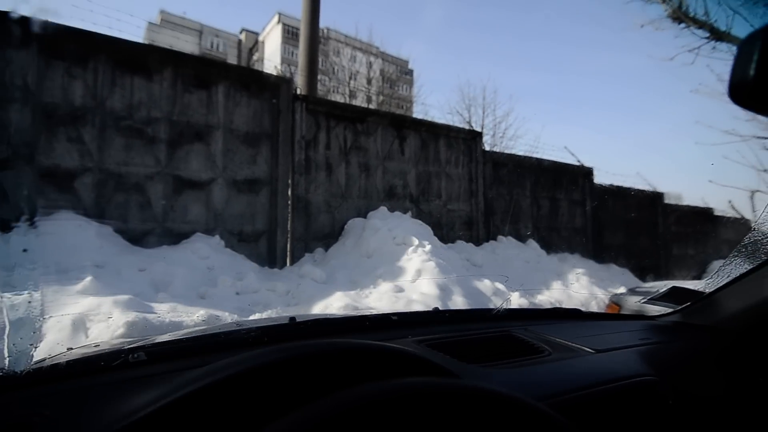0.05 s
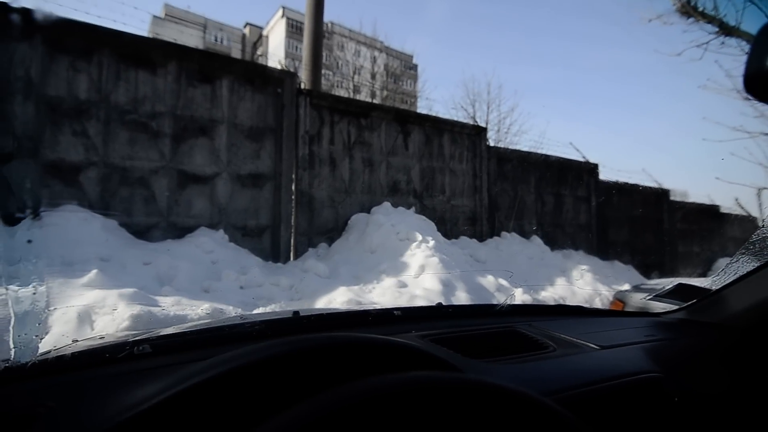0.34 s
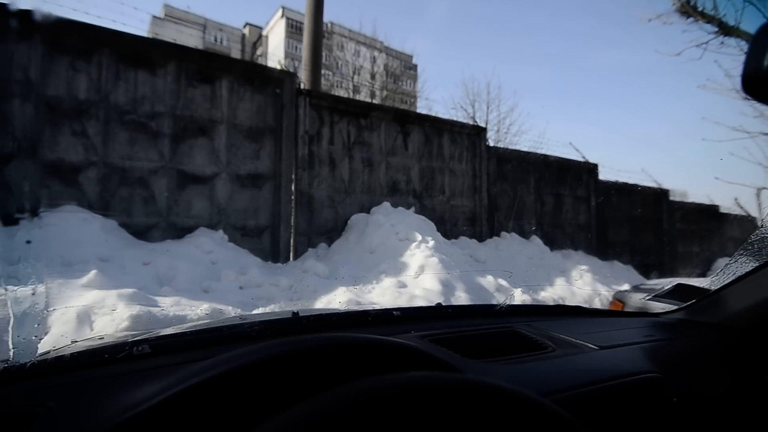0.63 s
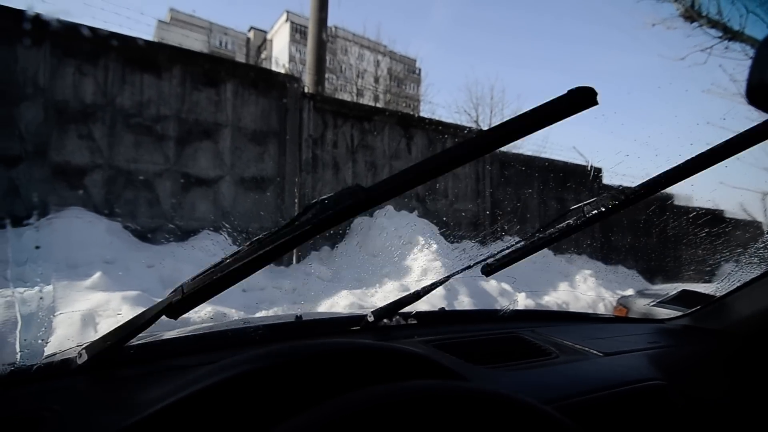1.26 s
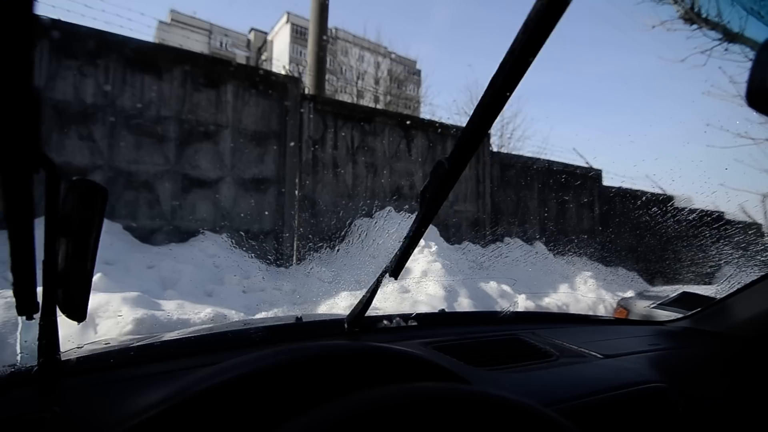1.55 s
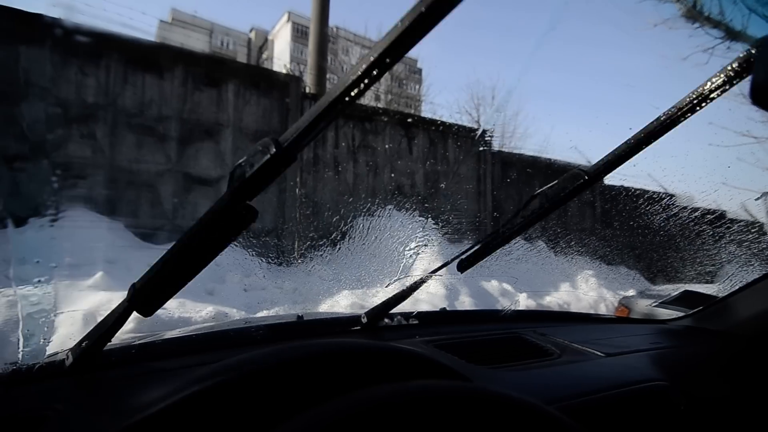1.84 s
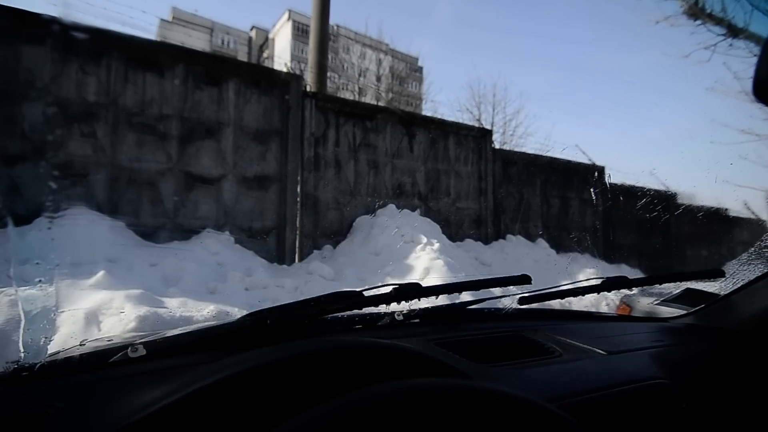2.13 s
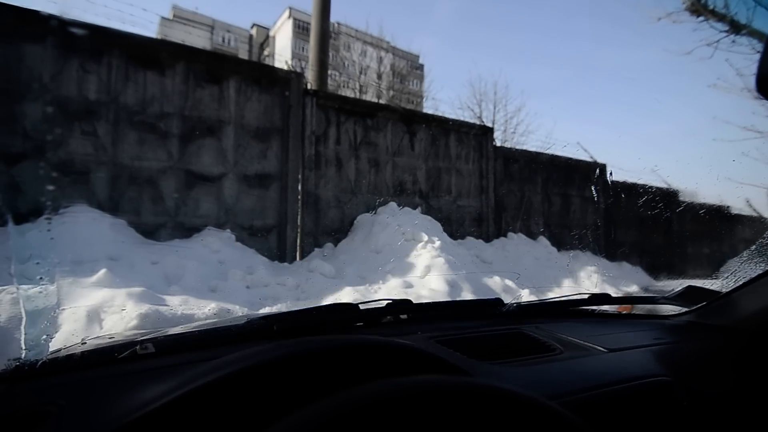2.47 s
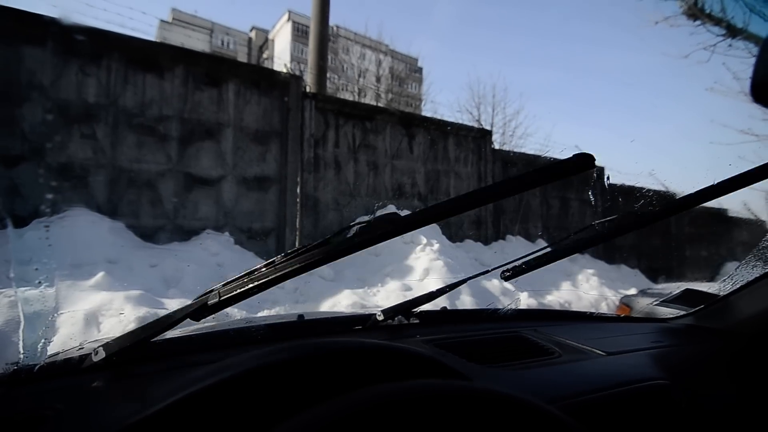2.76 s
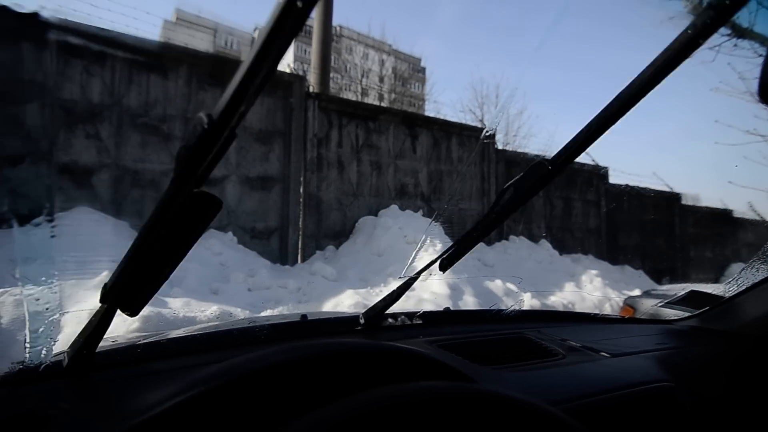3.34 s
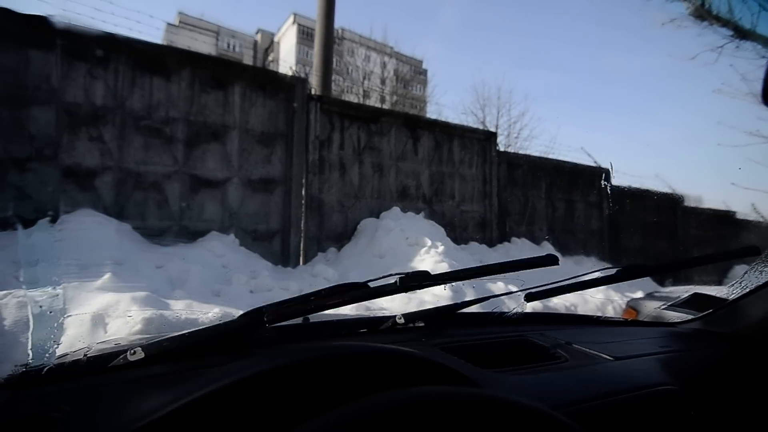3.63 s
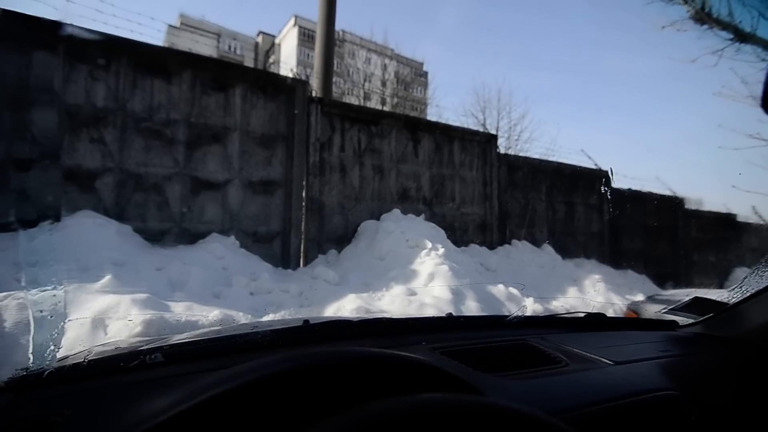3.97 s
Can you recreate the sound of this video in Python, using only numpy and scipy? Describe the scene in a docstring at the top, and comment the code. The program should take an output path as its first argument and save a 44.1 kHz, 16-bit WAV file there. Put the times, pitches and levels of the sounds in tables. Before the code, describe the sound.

Windshield wipers land with a clunk right at the start, heard close inside a parked car. The washer pump whirs and sprays softly from about 0.5 to 2.2 seconds. The blades sweep twice with a low whir and faint wet hiss, thumping at the top at 1.7 and 3.3 seconds and landing with a clunk and clicks at 2.3 and 3.8. The engine idles and the heater fan rushes throughout.

```python
"""Windscreen wipers making two sweeps, heard close from the driver's seat of a parked car on one small
microphone. The wet blades hiss over the glass, flip with a dull thump at the top and land with a clunk
at the bottom, followed by the click of their relay. The washer pump whirs and sprays the windscreen
during the first sweep. Behind it all the engine idles and the heater fan rushes."""
import sys
import numpy as np
from scipy import signal
from scipy.fft import rfft, irfft, next_fast_len
from scipy.io import wavfile
from scipy.ndimage import uniform_filter1d

SR = 44100
rng = np.random.default_rng(int(sys.argv[2]) if len(sys.argv) > 2 else 0)


def transcribe(u):
    """Save the signal u as a 16-bit wav file named by the first command-line argument.

    u: samples, shape (n,) or (channels, n), limited to [-1, 1]; the rate is SR.
    q: integer samples, one column per channel.
    """
    v = np.clip(np.atleast_2d(u).T, -1, 1)
    q = np.round(v * 32767).astype(np.int16)
    wavfile.write(sys.argv[1], SR, q)


N = 176400


def wiper_strokes():
    """Wet rubber hisses over the glass and the motor whirs; downstrokes start at once and hiss louder."""
    # blade strokes (start t/s, end t/s, fade/s, hiss level/dB, whir level/dB)
    strokes = [(0.77, 1.713, 0.18, -62.5, -46.5), (1.737, 2.265, 0.03, -60, -47),
               (2.44, 3.24, 0.13, -64.5, -52), (3.283, 3.86, 0.029, -61, -43)]
    # spectrum of wet rubber on glass (f/Hz, level/dB)
    rub_spectrum = [(300, -1), (1200, -6), (2800, -2.5), (4500, -8.5), (6500, -10.5), (8500, -12.5),
                    (10500, -15.5), (12500, -27), (15000, -35)]
    # spectrum of the wiper motor through the bulkhead (f/Hz, level/dB)
    whir_spectrum = [(60, -11), (130, 27), (200, 1), (290, 26), (380, -5.5), (480, 4.5), (650, -42),
                     (1500, -36.5)]
    rub = noise(rub_spectrum) * undb(walk(42))  # flickers by about 1 dB
    whir = noise(whir_spectrum)
    return sum(gate(start, end, fade) * (undb(hiss_db) * rub + undb(whir_db) * whir)
               for start, end, fade, hiss_db, whir_db in strokes)


def blade_thumps():
    """The blades thump on the glass, softly during a stroke and loudest as they flip at the top."""
    # thumps (t/s, level/dB)
    thumps = [(.849, -29), (1.611, -30), (1.7453, -16.5), (1.793, -26.5), (2.436, -30), (3.3003, -16.5),
              (3.342, -28)]
    # windscreen modes (f/Hz, level/dB, t60/s)
    glass_modes = [(58.4, -13.5, 0.75), (101.3, -10.5, 0.3), (124.7, 0.5, 0.11), (142, -14, 0.48),
                   (265.3, -12.5, 0.12), (426, -15.5, 0.048)]
    # spectrum of the dull panel noise (f/Hz, level/dB)
    thud_spectrum = [(40, -20), (130, -6), (300, -8.5), (550, -8.5), (900, -19.5), (2000, -36), (4000, -51),
                     (14000, -99)]
    out = np.zeros(N)
    for start, db in thumps:
        boom = ring(glass_modes, attack=0.0046)
        thud = undb(-12) * rattle(thud_spectrum, attack=0.016)
        add(out, start, undb(db) * (boom + thud))
    return out


def arm_landings():
    """The arms land hard at their rest, ringing and clattering on the cowl."""
    # landings (t/s, ring level/dB, clatter level/dB, clatter tilt/dB per octave)
    landings = [(0.0256, -13, -19.5, 1.4), (2.2509, -16, -20, 1.5), (3.783, -21.5, -25.5, -1.4)]
    # modes of arms and cowl (f/Hz, level/dB, t60/s)
    cowl_modes = [(81, -11.5, 0.26), (114.6, -10, 0.37), (149.7, -15, 0.51), (213.7, -10.5, 0.19),
                  (289.3, -4.5, 0.12), (358, -8, 0.023), (477.7, -3.5, 0.072), (519, -5, 0.087),
                  (769, -13.5, 0.082), (1690, -22.5, 0.027)]
    # spectrum of the clatter (f/Hz, level/dB)
    clatter_spectrum = [(35, -54), (90, 6.5), (300, 2), (520, 5.5), (660, -13), (820, 1), (1100, -7.5),
                        (1600, -6.5), (2200, -15.5), (3000, -11), (4300, -20.5), (5300, -29), (6500, -42),
                        (14000, -67)]
    out = np.zeros(N)
    for start, ring_db, clatter_db, tilt in landings:
        tilted = [(hz, db + tilt * np.log2(hz / 500)) for hz, db in clatter_spectrum]
        clatter = undb(clatter_db) * rattle(tilted, attack=0.003)
        clunk = undb(ring_db) * ring(cowl_modes, attack=0.003)
        add(out, start, clunk + clatter)
    return out


def rubber_judder():
    """Rubber judders on the glass as a blade starts or slows: a shaky tone with its third harmonic."""
    # judders (start t/s, end t/s, f/Hz, level/dB)
    judders = [(0.828, 0.916, 136, -36), (2.296, 2.413, 123.4, -29), (3.252, 3.307, 266, -32)]
    out = np.zeros(N)
    for start, end, hz, db in judders:
        pitch = hz * (1 + 0.038 * walk(80))
        out += gate(start, end, ramp=0.036) * (tone(pitch, db) + tone(3 * pitch, db - 22))
    return out


def relay_clicks():
    """Relay and linkage click: a short ping with a rattle of the housing."""
    # clicks (t/s, level/dB, ring f/Hz)
    clicks = [(0.0883, -26.5, 2770), (1.756, -32, 2140), (2.1155, -31, 2640), (2.2867, -19.5, 2880),
              (2.3028, -22.5, 2870), (3.310, -29, 2110), (3.523, -41, 2606), (3.805, -45, 4850),
              (3.846, -24.5, 2790)]
    # modes of a click (multiple of its ring frequency, level/dB, t60/s)
    click_modes = [(0.879, -5, 0.02), (0.998, 0.5, 0.012), (1.13, -9, 0.021), (1.65, -19.5, 0.0044)]
    # spectrum of the housing noise (f/Hz, level/dB)
    housing_spectrum = [(400, 2.5), (1200, 0.5), (1900, -5.5), (2700, -1), (3300, -5), (4000, -13),
                        (6000, -18), (14000, -50)]
    attack_s = 0.0014
    out = np.zeros(N)
    for start, db, hz in clicks:
        ping = ring([(hz * ratio, mode_db, t60) for ratio, mode_db, t60 in click_modes], attack_s)
        housing = undb(-9.5) * rattle(housing_spectrum, attack_s)
        add(out, start, undb(db) * (ping + housing))
    return out


def washer_pump():
    """The pump whirs, its speed sagging whenever the wiper motor takes current."""
    # pump speed (t/s, f/Hz)
    pump_speed = [(.55, 222), (.67, 233), (.778, 232), (.805, 226), (.94, 230.5), (1.17, 229.5), (1.3, 232),
                  (1.71, 233.4), (1.77, 228), (1.95, 231), (2.1, 226)]
    # pump tones (multiple of its speed, level/dB)
    pump_tones = [(1, -42), (2, -55.5), (5, -65), (6, -56), (12, -69)]
    hz = np.interp(np.arange(N) / SR, *np.array(pump_speed).T) * (1 + 0.001 * walk(25))
    whir = sum(tone(hz * order, db + walk(15.9)) for order, db in pump_tones)
    return whir * gate(0.54, 2.14, ramp=0.146)


def washer_spray():
    """Fine drops patter on the glass, each a tiny impulse at a random moment."""
    # spectrum of the spray landing (f/Hz, level/dB)
    spray_spectrum = [(300, -5), (1400, -0.5), (3000, -3), (5000, -12.5), (8000, -21), (14000, -43)]
    drops_per_s = 1700
    drops = (rng.random(N) < drops_per_s / SR) * rng.standard_normal(N)
    return undb(-60) * unit(colour(drops, spray_spectrum)) * gate(0.83, 2.18, ramp=0.069)


def trim_ticks():
    """Trim near the dashboard gives small crisp ticks, each a snap of bright noise."""
    # ticks (t/s, level/dB, peak f/Hz)
    ticks = [(0.331, -58.5, 4500), (.376, -66, 11600), (0.476, -51.5, 8000), (0.7632, -45, 4800),
             (0.923, -50, 2800), (1.331, -38, 2550), (1.9304, -30.5, 1440), (2.286, -39.5, 3000)]
    # treble roll-off of the ticks (f/Hz, level/dB)
    roll_off = [(8500, 0), (11000, -6), (15000, -19)]
    slope_db_per_octave = -9
    out = np.zeros(N)
    for start, db, hz in ticks:
        shape = [(hz * 0.33, -20), (hz, 0), (hz * 10, slope_db_per_octave * np.log2(10))]
        burst = colour(rng.standard_normal(SR // 2), shape)
        snap = unit(colour(burst, roll_off))
        add(out, start, undb(db) * snap * strike(attack=0.0021, t60=0.059))
    return out


def engine_idle():
    """The engine hums and its belt-driven parts whine, all on one wavering speed."""
    # engine hum (multiple of the crank rate, level/dB)
    orders = [(1, -47), (2, -43), (4, -42), (10, -56.5), (11, -49), (12, -45), (13, -55.5), (14, -53),
              (18, -66), (24, -63)]
    # whines of the belt-driven parts (f/Hz, level/dB)
    whines = [(843, -63), (1222, -62), (1432, -65)]
    crank_hz = 25.32
    speed = 1 + 0.002877 * walk(3)
    hum = sum(tone(crank_hz * order * speed, db + 0.1 * walk(12)) for order, db in orders)
    whine = sum(tone(hz * speed, db + 2.16 * walk(9)) for hz, db in whines)
    return hum + whine


def heater_fan():
    """The fan's rush fills the cabin, its level flickering slightly."""
    # spectrum of the fan and cabin rumble (f/Hz, level/dB)
    fan_spectrum = [(30, -21), (70, -22), (115, -6), (180, -9), (225, -6.5), (272, 2.5), (335, -16),
                    (390, -10.5), (465, -2), (570, -15.5), (700, -21.5), (800, -20), (1050, -25.5),
                    (1350, -20.5), (2000, -27), (2750, -27), (4000, -37), (5000, -44), (8000, -44.5),
                    (11000, -61), (15000, -65)]
    return noise(fan_spectrum) * undb(-39 + 1.22 * walk(40))


def rattle(points, attack):
    """A blow stirs the dense resonances of panels and cabin; the bass rings longest."""
    # ring time of the cabin and its panels (f/Hz, t60/s)
    cabin_decay = [(80, 0.9), (250, 0.48), (600, 0.11), (1500, 0.086), (4000, 0.067), (12000, 0.088)]
    burst = unit(colour(rng.standard_normal(SR // 2), points))
    spectrum, hz = rfft(burst), np.fft.rfftfreq(len(burst), 1 / SR)
    out = np.zeros(len(burst))
    for centre, t60 in cabin_decay:
        band = lookup([(f, f == centre) for f, _ in cabin_decay], hz)  # triangular weight
        out += irfft(spectrum * band, len(burst)) * strike(attack, t60)
    return out


def ring(modes, attack, detune=0.005):
    """Decaying modes (f/Hz, level/dB, t60/s), slightly detuned at each blow."""
    t = np.arange(SR // 2) / SR
    out = np.zeros(len(t))
    for hz, db, t60 in modes:
        pitch = hz * (1 + detune * rng.standard_normal())
        out += undb(db) * strike(attack, t60) * np.sin(2 * np.pi * pitch * t)
    return out


def strike(attack, t60):
    """Half a second of envelope: rounded rise, exponential fall (times in s)."""
    t = np.arange(SR // 2) / SR
    rise = np.sin(np.pi / 2 * np.minimum(t / attack, 1)) ** 2
    return rise * np.exp(-np.log(1000) * np.maximum(t - attack, 0) / t60)


def gate(on, off, ramp):
    """Fade in, hold, fade out (times in s)."""
    t = np.arange(N) / SR
    return np.clip(np.minimum(t - on, off - t) / ramp, 0, 1)


def tone(hz, db):
    """A sine that follows a pitch curve, at an rms level."""
    return np.sqrt(2) * undb(db) * np.sin(2 * np.pi * (np.cumsum(hz) / SR + rng.random()))


def walk(rate):
    """Smooth random drift, rms 1, with `rate` new values a second."""
    hold = int(SR / rate)
    steps = np.repeat(rng.standard_normal(N // hold + 1), hold)
    return unit(uniform_filter1d(uniform_filter1d(steps, hold), hold)[:N])


def noise(points):
    """Noise of a given colour, rms 1."""
    return unit(colour(rng.standard_normal(N), points))


def colour(x, points):
    """Filter by a curve (f/Hz, level/dB)."""
    size = next_fast_len(len(x) + SR // 10)
    gain = undb(lookup(points, np.fft.rfftfreq(size, 1 / SR)))
    return irfft(rfft(x, size) * gain, size)[:len(x)]


def lookup(points, hz):
    """Read a table on a log-frequency axis."""
    freqs, values = np.array(points, float).T
    return np.interp(np.log(np.maximum(hz, 1)), np.log(freqs), values)


def undb(db):
    """Decibels to gain."""
    return 10 ** (np.asarray(db) / 20)


def unit(x):
    """Scale to rms 1."""
    return x / np.sqrt(np.mean(x ** 2) + 1e-20)


def add(out, start, sound):
    """Mix a sound in at `start` seconds."""
    i = max(int(start * SR), 0)
    out[i:i + len(sound)] += sound[:N - i]


def scene():
    """Everything heard from the driver's seat, in mono."""
    background = engine_idle() + heater_fan()
    washer = washer_pump() + washer_spray()
    wipers = wiper_strokes() + blade_thumps() + arm_landings() + rubber_judder() + relay_clicks()
    return (wipers + washer + trim_ticks() + background)[None]


def record(dry):
    """A small microphone thins the deepest bass, colours the treble and cuts the top."""
    # microphone response: bass cut, narrow treble notches and peaks, falling top (f/Hz, level/dB)
    response = [(15, -24), (30, -8), (45, 0), (5000, 0), (5250, 2), (5500, -2), (5750, -14), (6050, -2),
                (6650, 0), (6880, -7), (7100, -1), (7550, 4), (8200, 0), (12000, 0), (13500, -3),
                (15000, -8)]
    top_hz = 15700
    sound = colour(dry[0] * gate(0, N / SR, ramp=0.003), response)
    low_pass = signal.ellip(8, 0.2, 80, top_hz, fs=SR, output="sos")
    return signal.sosfilt(low_pass, sound)[None]


dry = scene()
out = record(dry)
transcribe(out)
```